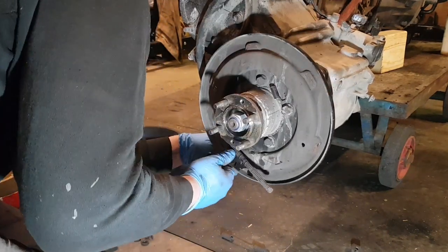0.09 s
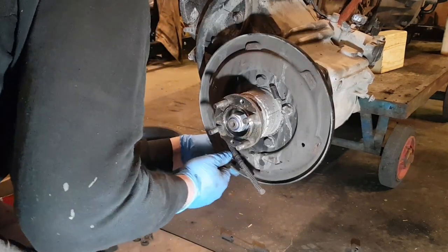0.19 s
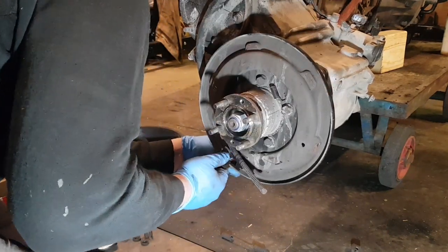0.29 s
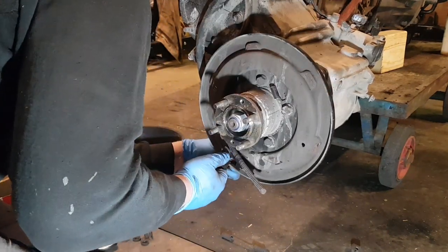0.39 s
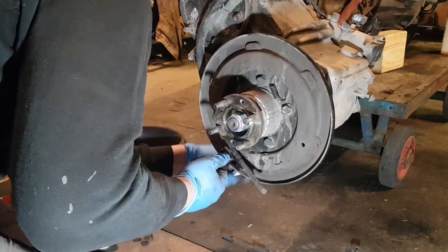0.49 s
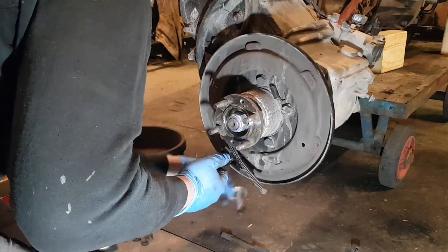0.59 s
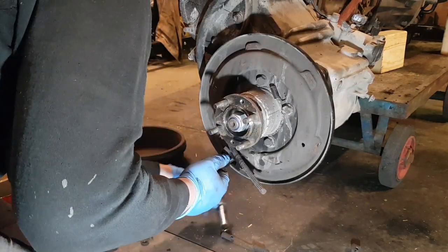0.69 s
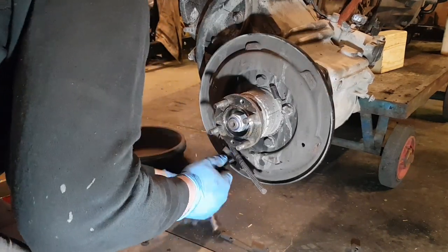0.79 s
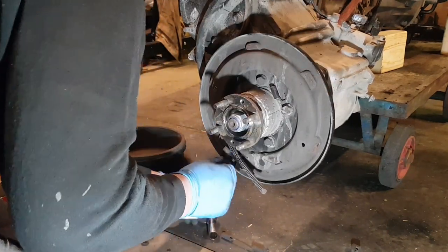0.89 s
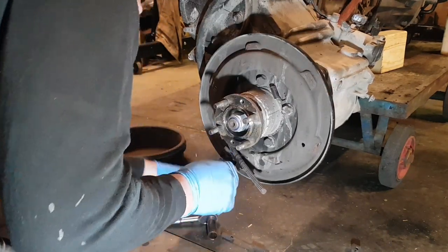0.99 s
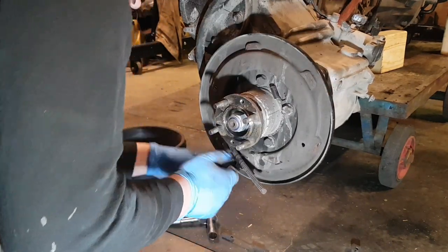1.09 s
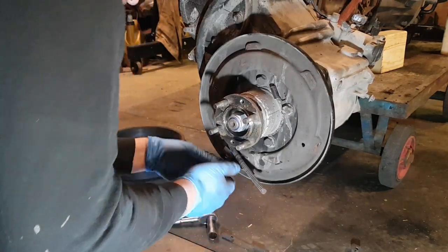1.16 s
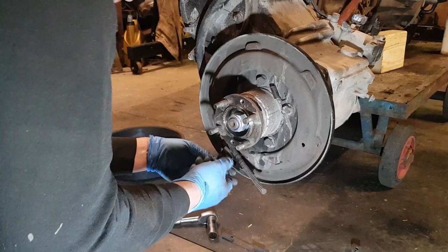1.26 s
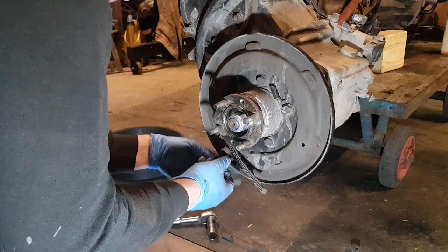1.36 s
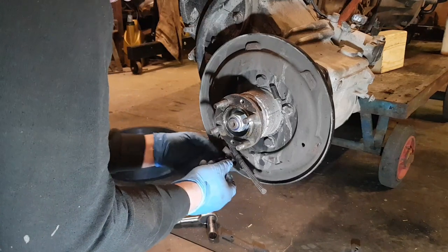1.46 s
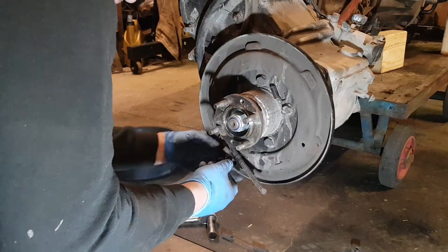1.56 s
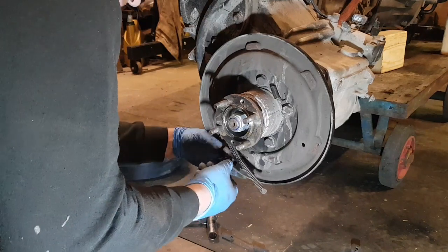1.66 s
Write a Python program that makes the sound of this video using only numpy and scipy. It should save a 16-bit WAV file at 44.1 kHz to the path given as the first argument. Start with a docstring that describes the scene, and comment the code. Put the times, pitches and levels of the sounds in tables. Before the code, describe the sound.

A socket wrench clatters onto a concrete garage floor between knocks and clinks at a brake adjuster.

```python
"""First a jaw scrapes and a backplate knocks: a spanner works a stiff drum-brake adjuster in a garage.
Slips push the plate's decaying modes and noise cracks; the spanner clinks as struck steel modes.
In between, a socket wrench lands on the concrete floor: clicks split into bands, with a short clatter.
Shaped noise makes the rustling clothes and low rumble; steady sines make the faint hum underneath."""
import sys
import numpy as np
from scipy import signal
from scipy.fft import rfft, irfft
from scipy.io import wavfile

SR = 44100
rng = np.random.default_rng(int(sys.argv[2]) if len(sys.argv) > 2 else 0)


def to_wav(sig):
    """Store sig (one row per channel, or 1-D mono) as 16-bit WAV at the path in sys.argv[1].

    Samples outside -1..1 are clipped; the rate is SR.
    """
    pcm = np.clip(np.atleast_2d(sig), -1, 1) * 32767
    pcm = np.round(pcm).astype(np.int16)
    wavfile.write(sys.argv[1], SR, pcm.T)  # frames by channels


N = 74970
TIME = np.arange(N) / SR
HZ = np.maximum(np.fft.rfftfreq(N, 1 / SR), 1)
STEEL_CATCHES_PER_S = 600
BRAKE_PAN_DB, RING_PAN_DB = 1, -4.7  # left minus right


def backplate():
    """Each slip is a soft or hard push that rings the plate, cracks it and stirs its low modes."""
    # slips of the adjuster: start_s, level_db, contact_brightness_hz, low_mode_boom_db
    slips = [(.0185, -34.5, 700, -18), (.083, -36.5, 5500, -3.5), (.146, -42, 4800, -3),
             (.164, -37, 2200, -20), (.2085, -31, 4840, -4), (.2135, -28.5, 2400, -14),
             (.2198, -24, 2900, -2), (.2272, -26.5, 990, 2.5), (.2605, -20.5, 2700, -4.5),
             (.2693, -24, 4000, 3), (.278, -15, 8000, -8.5), (.2868, -7, 2100, -8.5),
             (.3255, -35.5, 1400, -3.5), (.3645, -31, 910, -11), (.397, -41.5, 1400, -4),
             (1.272, -31, 7000, 0), (1.3055, -27, 2200, -1.5), (1.3205, -26, 2200, 4),
             (1.374, -29, 750, 4.5), (1.446, -28.5, 478, -9), (1.4548, -40, 481, -10)]
    # low modes of the plate: pitch_hz, level_db, t60_s
    low_modes = [(386, -29, 0.14), (431.5, -20, 0.1)]
    # main modes of the plate: pitch_hz, level_db, t60_s
    main_modes = [(794.4, 1, 0.068), (800.4, -17, 0.24), (886, -1.5, 0.019), (1034, -16, 0.07),
                  (1138.5, -12, 0.026), (1492, -23.5, 0.11), (2485, -18.5, 0.075), (2524, -27, 0.034),
                  (3230, -14, 0.013)]
    # spectrum of the dense short modes: pitch_hz, level_db
    crack_colour = [(100, -38), (300, -12.5), (550, 1.5), (750, 15.5), (1100, 11.5), (1500, 9),
                    (2000, -1.5), (2700, 9.5), (3500, 3), (5000, -6), (10000, -5), (15000, -12)]
    # the dragging adjuster keeps the plate humming: time_s, level_db
    drag_curve = [(0, -93), (.035, -73), (.07, -83.5), (.12, -68), (.2, -67.5), (.25, -78.5), (.42, -77),
                  (.46, -78.5), (.55, -110)]
    boom_cut_hz, plate_cut_hz = 250, 880  # low cuts that thin the bass of the plate's ring and crack

    each_push = [soften(click(start_s, db), bright_hz) for start_s, db, bright_hz, _ in slips]
    pushes = sum(each_push)
    booms = sum(from_db(slip[-1]) * push for slip, push in zip(slips, each_push))
    drag = level(drag_curve) * soften(catches(STEEL_CATCHES_PER_S), hz=2200)

    low_ring = low_cut(convolve(booms, ringing(low_modes)), boom_cut_hz)
    main_ring = low_cut(convolve(pushes + drag, ringing(main_modes)), plate_cut_hz)
    crack_noise = burst(colour(diffuse(), crack_colour), t60=0.13)
    crack = low_cut(from_db(10.5) * convolve(pushes, crack_noise), boom_cut_hz)

    ring_in_room = garage(low_ring + main_ring, early_db=-30, room_db=-12)
    crack_in_room = garage(crack, early_db=-17, room_db=-9)
    return pan(RING_PAN_DB) * ring_in_room + pan(BRAKE_PAN_DB) * crack_in_room


def spanner():
    """Steel strikes steel: a tick, a crack and the spanner's bright ring."""
    # jaw blows: start_s, level_db, favoured_pitch_hz, width_hz, tick_db
    clinks = [(0.083, -51, 1450, 200, -37), (0.277, -29, 3293, 394, -19), (0.444, -23.5, 3090, 640, -27.5),
              (1.272, -26.5, 2520, 240, -17), (1.308, -35, 3580, 80, -42), (1.507, -39, 3680, 50, -41)]
    # modes of the spanner: pitch_hz, level_db, t60_s
    modes = [(1491, -3, .11), (1782, -11, .17), (2430, -9, .1), (2530, -21, .16), (2620, -9, .07),
             (2799, -16, .09), (3076, -12.5, .11), (3290, -11, .04), (3488, -17, .17), (4598, -15, .14),
             (5803, -27, .15), (7074, -21, .17), (9690, -21, .11)]
    # spectrum of the crack: pitch_hz, level_db
    crack_colour = [(500, 6), (1500, 9.5), (2000, 4.5), (3100, 4), (4000, 4.5), (4600, 1), (5400, -7.5),
                    (9000, -12), (15000, -11)]
    # spectrum of the tick: pitch_hz, level_db
    tick_colour = [(300, -19.5), (1200, 13.5), (2000, -3.5), (3500, 6.5), (5000, -2), (6200, -2),
                   (7100, -0.5), (8200, -22), (15000, -14.5)]

    blows = sum(resonance(click(start_s, db), hz, width_hz) for start_s, db, hz, width_hz, _ in clinks)
    contacts = sum(click(start_s, tick_db) for start_s, *_, tick_db in clinks)
    ticks = convolve(contacts, burst(colour(diffuse(), tick_colour), t60=0.06))
    crack_noise = burst(colour(diffuse(), crack_colour), t60=0.05)
    crack = from_db(19) * convolve(blows, crack_noise)

    ring_in_room = garage(convolve(blows, ringing(modes)), early_db=-9, room_db=-5)
    noise_in_room = garage(crack + ticks, early_db=-2, room_db=-8.5)
    return pan(RING_PAN_DB) * (ring_in_room + noise_in_room)


def wrench():
    """Dead knocks on concrete with chatter and a faint ring; the loose head smears the top to a rattle."""
    # the socket lands first, then the handle:
    # start_s, thump_db, knock_db, clack_db, crack_db, tick_db, rattle_db
    landings = [(0.7691, -11, -2, -3, -10.5, -18.5, -42), (0.791, -25, -10, -3.5, -18, -43, -40),
                (0.8062, -22, -5, -5.5, -16.5, -41, -35.5), (0.8602, 1, 12.5, 13, -2, -17, -22),
                (.8637, -11.5, -19, 7, -22, -27.5, -24.5), (.8705, -14, 5, 3.5, -10.5, -37, -22.5),
                (.977, 5, -10, 6, -1, -14.5, -16.5), (0.9817, -30, 4.5, -22, -11.5, -24, -12),
                (1.048, -11, -7.5, -10, -21, -27, -50), (1.053, -29, -15.5, -16, -23, -26, -50)]
    # the ranges of those six levels, thump to rattle: low_hz, high_hz
    ranges = [(150, 380), (480, 880), (800, 1400), (1400, 2800), (4000, 6200), (9000, 15000)]
    # modes of the wrench: pitch_hz, level_db, t60_s
    modes = [(266, -36, 0.24), (634, -46, 0.18), (890, -43, 0.21), (1136, -51, 0.35), (1216, -42, 0.33),
             (1510, -42.5, 0.19), (3830, -47, 0.3), (5180, -53, 0.14)]

    hits = [sum(click(start_s, levels[k]) for start_s, *levels in landings) for k in range(len(ranges))]
    rattle = convolve(hits[-1], burst(diffuse(), t60=0.012))
    hits[-1] = rattle
    # neighbouring ranges alternate in polarity
    knocks = sum((-1) ** k * band(hit, *edges) for k, (hit, edges) in enumerate(zip(hits, ranges)))
    # the rattling head has a resonance of its own
    knocks = knocks + from_db(-4.5) * resonance(rattle, hz=7150, width_hz=540)
    chatter = convolve(knocks, burst(catches(per_s=200), t60=0.087))
    knocks = knocks + from_db(-9.5) * chatter

    ring = from_db(-14) * convolve(knocks, ringing(modes))
    return pan(-3) * (garage(knocks, early_db=-1.5, room_db=4) + ring)


def scrape():
    """The jaw rubs over rusty steel as the adjuster is forced round: a stream of tiny coloured catches."""
    # strength of the rub, ahead of the final halving: time_s, level_db
    curve = [(0, -59), (.07, -63.5), (.11, -52.5), (.17, -49), (.22, -46), (.25, -51), (.29, -54.5),
             (.34, -67.5), (.42, -72.5), (.5, -130)]
    # spectrum of the rub: pitch_hz, level_db
    rub_colour = [(400, -11), (800, 7), (1300, 5), (2000, -22.5), (3200, 5), (4400, -12.5), (5300, -5.5),
                  (5900, 1), (6700, -7), (8400, -9.5), (9800, -7), (11000, -9), (13300, -9), (14400, -2),
                  (15600, -5)]
    rub = level(curve) * colour(catches(STEEL_CATCHES_PER_S), rub_colour)
    return pan(BRAKE_PAN_DB) * garage(rub, early_db=3, room_db=-2) / 2


def clothes():
    """Sleeve and gloves rustle: shaped noise that swells and fades."""
    # strength of the rustle: time_s, level_db
    curve = [(0, -60), (.4, -67), (.72, -66.5), (1.05, -54), (1.2, -58), (1.44, -61), (1.51, -56),
             (1.63, -58.5), (1.7, -63.5)]
    # spectrum of the rustle: pitch_hz, level_db
    rustle_colour = [(300, 11.5), (1000, 8), (2000, -0.5), (3700, 6.5), (6000, 3.5), (10000, 4),
                     (15000, 5.5)]
    return level(curve) * colour(diffuse(), rustle_colour)


def rumble():
    """Steady room rumble: noise weighted towards the bass."""
    # spectrum of the rumble: pitch_hz, level_db
    air_colour = [(20, -16), (35, -6), (58, 9.5), (90, 6.5), (140, -7), (250, -16), (600, -26.5),
                  (2000, -45.5)]
    return from_db(-52) * colour(diffuse(), air_colour)


def hum():
    """Faint steady sines, each starting at a random phase."""
    # hum tones: pitch_hz, rms_level_db
    tones = [(58, -59), (115, -59.5), (175, -68)]
    return sum(from_db(db) * np.sqrt(2) * np.sin(2 * np.pi * (hz * TIME + rng.random()))
               for hz, db in tones)


def garage(x, early_db, room_db):
    """Direct sound, close reflections from vehicle and floor, and a tail whose decay depends on pitch."""
    # decay of the tail: pitch_hz, t60_s
    room_decay = [(150, 0.17), (400, 0.41), (900, 0.33), (3000, 0.45), (7000, 0.3), (14000, 0.28)]
    noise = rfft(diffuse())
    centres = np.log([hz for hz, _ in room_decay])
    tail = 0
    # overlapping bands, each with its own decay
    for share, (_, t60) in zip(np.eye(len(centres)), room_decay):
        weight = np.interp(np.log(HZ), centres, share)
        tail = tail + burst(irfft(noise * weight, N), t60)
    echoes = from_db(early_db) * burst(diffuse(), t60=0.3) + from_db(room_db) * tail
    delay = int(.002 * SR)  # 2 ms
    return x + convolve(x, np.pad(echoes, ((0, 0), (delay, 0))))


def catches(per_s):
    """Tiny contacts of rough steel, uneven in time and size; rms 1."""
    size_db = 4 * np.minimum(rng.exponential(1, N), 2)
    sizes = from_db(size_db) * rng.choice([-1, 1], N)
    grains = sizes * (rng.random(N) < per_s / SR)
    return grains / grains.std()


def ringing(modes):
    """What a unit blow sets ringing: decaying sines whose polarity flips in pairs."""
    return sum(from_db(db) * dying(t60) * np.sin(2 * np.pi * hz * TIME) * (-1) ** (k // 2 + 1)
               for k, (hz, db, t60) in enumerate(modes))


def click(s, db):
    """A single impulse."""
    return from_db(db) * (np.arange(N) == int(s * SR))


def burst(noise, t60):
    """Noise that dies away, scaled so that white noise of rms 1 gives about unit energy."""
    envelope = dying(t60)
    return noise * envelope / np.sqrt(np.sum(envelope ** 2))


def diffuse():
    """White stereo noise, alike in the bass and nearly unrelated in the treble."""
    # left-right likeness: pitch_hz, likeness (1 = identical)
    likeness = [(60, 0.98), (300, 0.8), (700, 0.2), (1400, 0.12), (3000, 0.028), (12000, .05)]
    mid, side = rfft(rng.standard_normal((2, N)))
    alike = np.clip(at_hz(likeness, HZ), 0, 1)
    common = np.sqrt((1 + alike) / 2) * mid
    opposed = np.sqrt((1 - alike) / 2) * side * [[1], [-1]]
    return irfft(common + opposed, N)


def colour(x, spectrum):
    """Shape a noise by a spectrum, keeping its power."""
    gain = from_db(at_hz(spectrum, HZ))
    return irfft(rfft(x) * gain / np.sqrt(np.mean(gain ** 2)), N)


def resonance(x, hz, width_hz):
    """Broad two-pole resonance with a gain of about 1 on top."""
    r = np.exp(-np.pi * width_hz / SR)
    feed = np.array([1, 0, -1]) * (1 - r * r) / 2
    feedback = [1, -2 * r * np.cos(2 * np.pi * hz / SR), r * r]
    return signal.lfilter(feed, feedback, x + 1e-18)


def soften(x, hz):
    """A softer contact lasts longer and has less treble."""
    r = np.exp(-2 * np.pi * hz / SR)
    return signal.lfilter([(1 - r) ** 2], [1, -2 * r, r * r], x + 1e-18)


def band(x, low_hz, high_hz):
    """Keep one range of pitch."""
    edges = [low_hz, min(high_hz, .45 * SR)]
    return signal.sosfilt(signal.butter(2, edges, "band", fs=SR, output="sos"), x + 1e-18)


def low_cut(x, hz):
    """Remove the bass."""
    return signal.sosfilt(signal.butter(3, hz, "high", fs=SR, output="sos"), x)


def convolve(x, response):
    """Pass a sound through a response."""
    return signal.fftconvolve(np.atleast_2d(x), np.atleast_2d(response), axes=-1)[:, :N]


def pan(db):
    """Left and right gains for a left-minus-right level."""
    return from_db(np.array([[.5], [-.5]]) * db)


def dying(t60):
    """Exponential decay, 60 dB down after t60 seconds."""
    return np.exp(-np.minimum(np.log(1000) * TIME / t60, 50))


def level(curve):
    """Gain over time from (s, dB) points."""
    return from_db(np.interp(TIME, *np.transpose(curve)))


def at_hz(points, hz):
    """Read a table on a log-frequency axis."""
    f, value = np.transpose(points)
    return np.interp(np.log(hz), np.log(f), value)


def from_db(db):
    """Decibels to gain."""
    return 10 ** (np.asarray(db) / 20)


def scene():
    """Everything together, in stereo."""
    work = backplate() + spanner() + wrench() + scrape()
    background = clothes() + rumble() + hum()
    return work + background


def record(dry):
    """The top is cut steeply above 15.85 kHz."""
    return signal.sosfilt(signal.ellip(12, .1, 90, 15850, fs=SR, output="sos"), dry)


dry = scene()
out = record(dry)
to_wav(out)
```